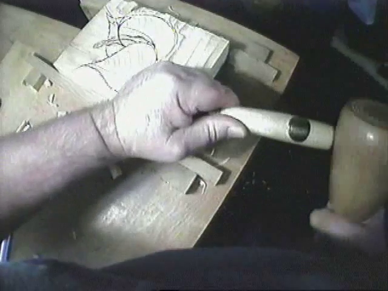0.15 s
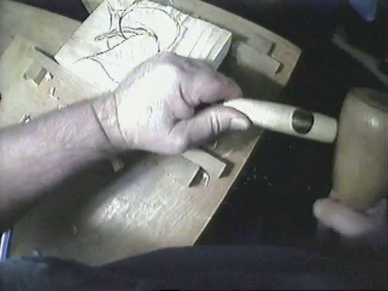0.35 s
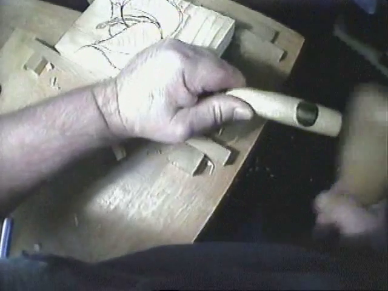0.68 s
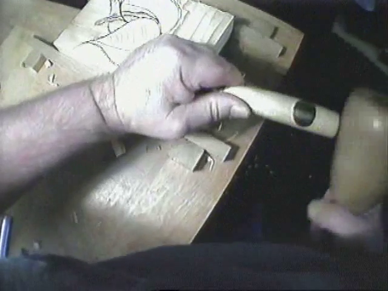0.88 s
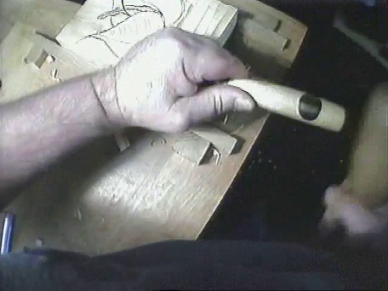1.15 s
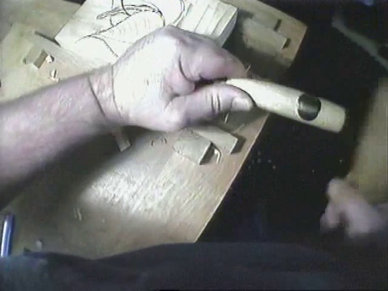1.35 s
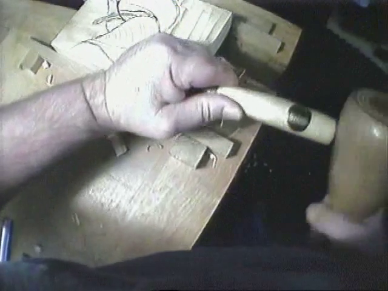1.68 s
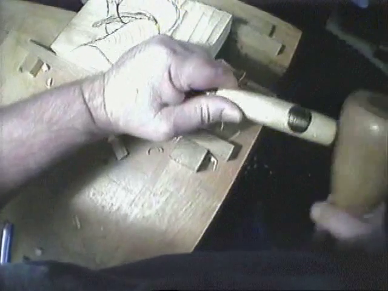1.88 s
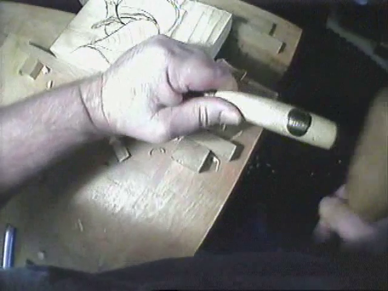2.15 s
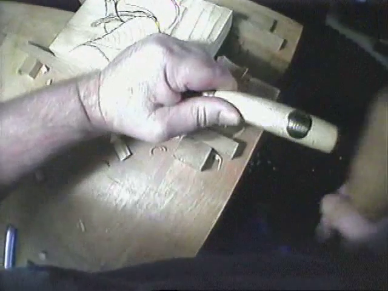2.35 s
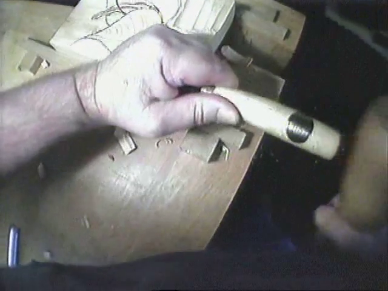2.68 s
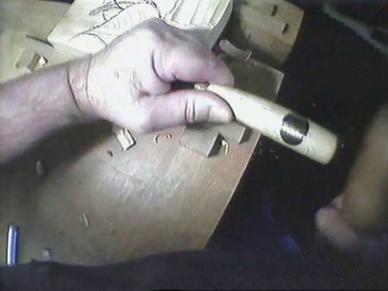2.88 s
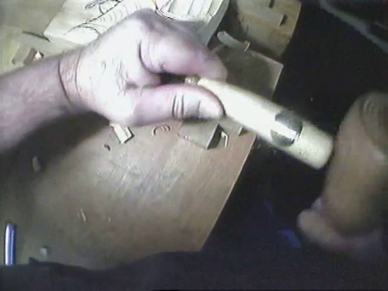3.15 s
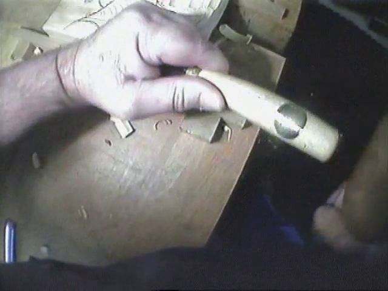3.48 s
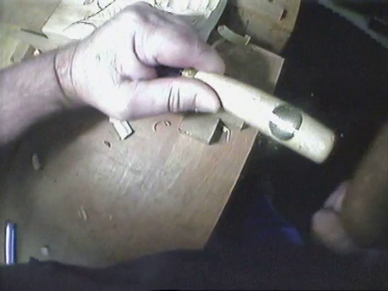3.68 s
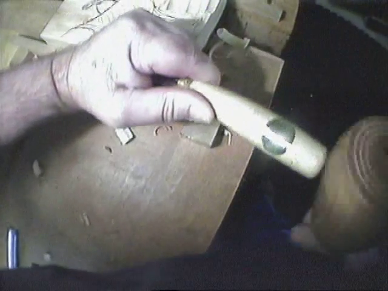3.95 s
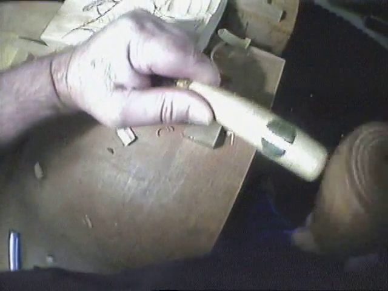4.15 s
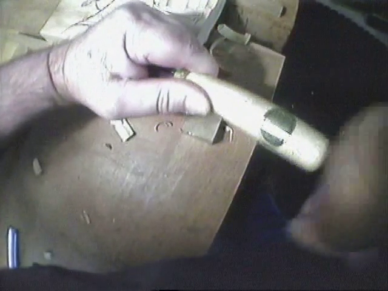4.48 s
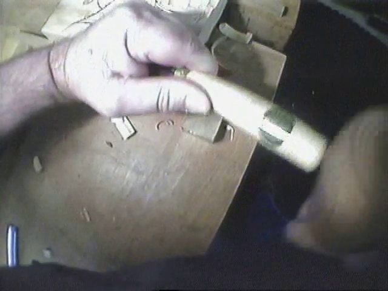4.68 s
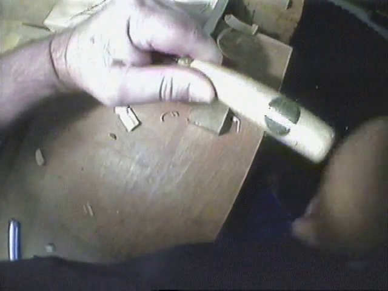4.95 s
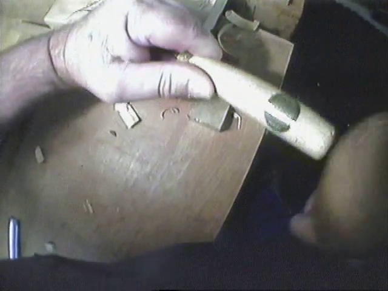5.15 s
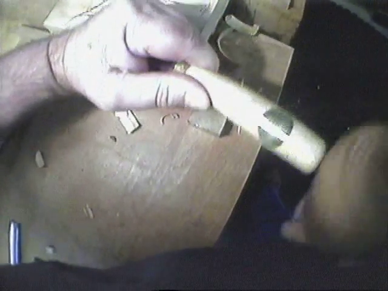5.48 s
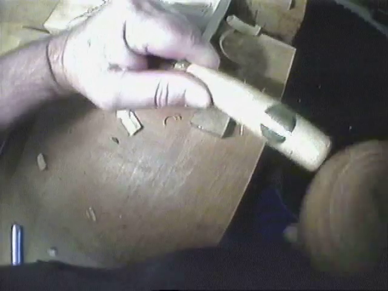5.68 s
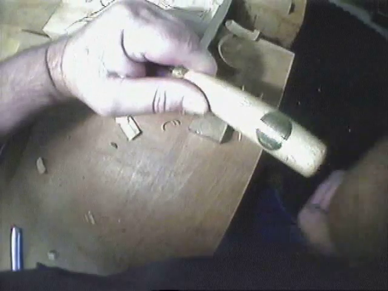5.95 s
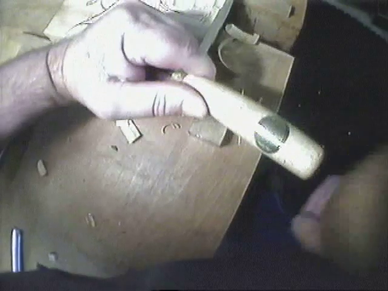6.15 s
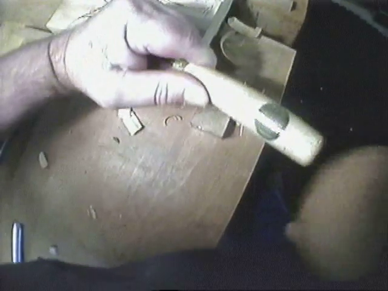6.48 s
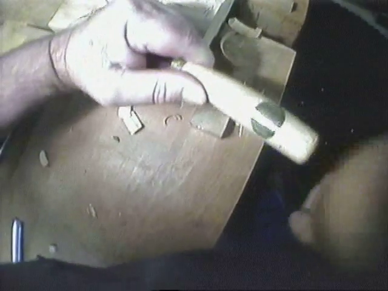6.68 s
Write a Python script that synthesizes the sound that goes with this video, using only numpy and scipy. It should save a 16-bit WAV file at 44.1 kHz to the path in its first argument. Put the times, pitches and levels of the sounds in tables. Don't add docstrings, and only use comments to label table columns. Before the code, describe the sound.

Steady, rapid mallet taps on a carving gouge, heard close in stereo. Hard woody clacks ring handle, steel and block for an instant, then the bench and room answer for a third of a second. Strong at first, they grow quieter, change colour slightly as the cut turns, and end with more knocky handle ring. One tiny shaving snap hides midway; quiet hum and hiss lie beneath.

```python
import sys
import numpy as np
from scipy import signal
from scipy.io import wavfile

SR = 44100
rng = np.random.default_rng(int(sys.argv[2]) if len(sys.argv) > 2 else 0)


def nominal_scale(level):
    x = np.asarray(level, float) / 20
    return 10 ** x


def waveform_to_disk(signal):
    frames = np.transpose(np.atleast_2d(signal))
    scaled = np.clip(frames, -1, 1) * 32767
    samples = np.round(scaled).astype(np.int16)
    wavfile.write(sys.argv[1], SR, samples)


N = 300938

# [t/s, peak level/dB, handle ring re peak/dB]
MALLET_BLOWS = [(0.09, -5.5, -19), (0.277, -6, -20), (0.469, -5.5, -18), (0.653, -5, -16.5),
                (0.836, -6, -16.5), (1.023, -5.5, -18), (1.214, -6, -18), (1.401, -5, -17),
                (1.593, -6, -18), (1.781, -7.5, -16), (1.972, -7.5, -15), (2.16, -9, -15.5),
                (2.356, -10.5, -15), (2.537, -11.5, -14.5), (2.727, -12, -15), (2.922, -11, -15.5),
                (3.116, -9.5, -14.5), (3.307, -9, -16),
                (3.499, -9, -14), (3.688, -8, -15.5), (3.879, -9, -14), (4.067, -7.5, -16),
                (4.261, -7.5, -18.5), (4.447, -7.5, -18), (4.643, -7.5, -18), (4.839, -7.5, -18.5),
                (5.037, -8, -19), (5.229, -8.5, -18), (5.423, -10.5, -18.5), (5.608, -9.5, -18.5),
                (5.802, -9.5, -18), (6.003, -9.5, -15.5), (6.197, -7.5, -16.5), (6.385, -8, -14.5),
                (6.571, -8, -13), (6.758, -9, -10)]
# [t/s, level/dB]
BLADE_FREEDOM = [
    (.1, 4),
    (1, 0.5),
    (1.6, 0.5),
    (2, -2),
    (3, -4),
    (4.1, -2.5),
    (5.5, 0.5),
    (6, -4),
    (6.8, -10.5),
]
COLOUR_HZ = [70, 200, 420, 1150, 2300, 8000]
STAGE_TIMES = [1.1, 2.6, 4.7, 6.4]
LEFT_LAGS = [.0005, .00061, .00065, .00065]
# [f/Hz, t60/s, left level/dB, right level/dB, change/dB at 3 later stages]
TOOL_MODES = [(157, 0.036, -38.5, -15, 4.5, 2, 4), (423, 0.029, -30, -9.5, -3.5, 2, 0.5),
              (735, 0.0053, 2, 0.5, 7, 9, 6), (1144.5, 0.011, -17, 3, 4, 2.5, 5.5),
              (1473, 0.0055, -2.5, 8.5, -0.5, -3, 1.5), (1892, 0.0069, -4.5, 0, -2.5, -9.5, -5),
              (2383, 0.0055, -1, 5.5, 1.5, 11, 5), (2880, 0.0037, 2, -45, -33, -67, -46),
              (3328, 0.0082, -9.5, -8.5, 0, 2.5, 4.5), (4515, 0.003, -39, 8, -1.5, 0.5, 0),
              (3940, 0.012, -10.5, -24.5, -2, -3, 1), (7108, 0.0056, -12, -16.5, 2.5, -2, 5),
              (8540, 0.0036, -26, -13.5, 3, -12, 9), (11540, 0.002, -9.5, -36, 5, -3, 11),
              (12700, .008, -34, -22, 1, -3, 7), (14700, 0.0029, -22, -23, 1, 9, -3)]
# [f/Hz, t60/s, swell/s, left level/dB, right level/dB, change/dB at 3 later stages]
BENCH_MODES = [(66.1, 0.21, 0.007, -34.5, -26.5, 7, 7, 6.5), (79.2, 0.35, 0.061, -35, -29.5, 1.5, -2.5, 0),
               (619.5, 0.05, 0.0017, -41.5, -41, -6, -38, -40),
               (176.2, 0.21, 0.0063, -26, -37, -0.5, -1.5, -2.5),
               (213.7, 0.35, 0.0073, -37.5, -33, 0, 2.5, -5),
               (251.2, 0.3, 0.06, -28.5, -25, -1.5, -6.5, -2),
               (269.4, 0.58, 0.06, -36, -33.5, -14, -30, -9), (383.3, 0.15, 0.003, -30, -29, 6.5, 10, 11),
               (508.2, 0.063, 0.0037, -28, -11, 0.5, 2, 2), (714.3, 0.27, 0.033, -69, -35, 12, 14, 14.5),
               (352, 0.051, 0.0038, -18.5, -18.5, -14, -61, -22),
               (761, 0.089, 0.0069, -23.5, -13.5, -0.5, -1.5, -1.5),
               (811.4, 0.17, 0.09, -69, -11, 8, -11, 3), (883, 0.25, 0.056, -56, -24, 3, 3.5, -9),
               (935, 0.064, 0.0077, -21, -93, 9, 0.5, 8)]
# [f/Hz, level per Hz/dB]
ROOM_COLOUR = [(40, -58), (75, -5), (125, -16.5), (240, -9.5), (330, -12), (500, -9), (780, -7.5),
               (1500, -11.5), (2500, -11.5), (4500, -22.5), (5800, -31.5), (8000, -45), (12000, -30.5),
               (16000, -85)]
# [f/Hz, t60/s]
ROOM_DECAY = [(50, 0.08), (130, 0.55), (350, 0.34), (920, 0.31), (2430, 0.27), (5200, 0.31), (14000, 0.055)]
# [f/Hz, left minus right level/dB]
STEREO_TILT = [(30, -21), (80, -4.5), (200, -4), (500, -5.5), (1300, -0.5), (3000, -3), (10000, 0.5)]
# [t/s, peak level/dB, f/Hz]
SHAVING_SNAPS = [
    (3.9728, -38.5, 6660),
]
# [f/Hz, level per Hz/dB]
HISS_COLOUR = [(25, 12), (40, 1.5), (80, 6), (400, -13), (2000, -23.5), (6000, -36), (10000, -35),
               (16000, -37.5)]


def rms_one(x):
    return x / np.sqrt(np.mean(x ** 2) + 1e-20)


def at_hz(points, hz):
    table = np.array(points)
    return np.interp(np.log(hz), np.log(table[:, 0]), table[:, 1])


def band_pass(x, low_hz, high_hz):
    return signal.sosfilt(signal.butter(2, [low_hz, high_hz], "band", fs=SR, output="sos"), x)


def noise_bands(length):
    edges = 22 * 2 ** (np.arange(30) / 3)
    white = rng.standard_normal((2, 2, length + 4000))
    bands = [band_pass(white[k % 2], edges[k], edges[k + 1]) for k in range(len(edges) - 1)]
    return np.sqrt(edges[1:] * edges[:-1]), np.array(bands)[..., -length:]


def colour_bands(points, hz, bands):
    side_db = at_hz(STEREO_TILT, hz)[:, None] * [0.5, -0.5]
    return nominal_scale(at_hz(points, hz)[:, None] + side_db)[..., None] * bands


def mode(t, hz, t60, swell, late=0):
    t = np.maximum(t, 0)
    rise = 1 - np.exp(-t / max(swell, 1e-5))
    return np.sin(2 * np.pi * hz * t - late) * nominal_scale(-60 * t / t60) * rise


def tool(t, left_lag):
    crest_s, contact_s = 0.00035, 0.0008
    crest_times = crest_s + np.array([[left_lag], [0]])
    rings = []
    for hz, t60, left, right, *change in TOOL_MODES:
        late = np.maximum(2 * np.pi * hz * crest_times - np.pi / 2, 0)
        rings.append(nominal_scale(np.array([[left], [right]])) * mode(t, hz, t60, contact_s, late))
    return np.array(rings)


def bench(t):
    return np.array([nominal_scale(np.array([[left], [right]])) * mode(t, hz, t60, swell)
                     for hz, t60, swell, left, right, *change in BENCH_MODES])


def room(t):
    level_db, start_s, swell_s = -21, 0.0029, 0.00013
    hz, bands = noise_bands(len(t))
    late = np.maximum(t - start_s, 0)
    fall = nominal_scale(-60 * late / at_hz(ROOM_DECAY, hz)[:, None, None]) * (1 - np.exp(-late / swell_s))
    coloured = colour_bands(ROOM_COLOUR, hz, bands)
    return hz, nominal_scale(level_db) * fall * coloured / coloured.sum(axis=0).std()


def blow_rows():
    thud_follows, steel_follows, block_lags = 0.96, 1.02, 0.94
    s, db, handle = np.transpose(MALLET_BLOWS)
    free = np.interp(s, *np.transpose(BLADE_FREEDOM))
    block = block_lags * (db.mean() - db)
    rows = np.transpose([s, db, thud_follows * free, block, handle - handle.mean(), steel_follows * free])
    rows = np.vstack([rows, rows[0]])
    rows[-1, :2] = -0.12, -2
    return rows


def blows():
    ring_s, lead_s = 0.7, 0.0003
    t = np.arange(round(ring_s * SR)) / SR
    short, bench_rings = t[:len(t) // 10], bench(t)
    solids = TOOL_MODES + BENCH_MODES
    solid_hz = [row[0] for row in solids]
    change_db = np.array([(0, *row[-3:]) for row in solids])
    (hz, first_room), (hz, last_room) = room(t), room(t)
    rows = blow_rows()
    scatter_db = 1.6 * rng.standard_normal((len(rows), len(solid_hz) + len(hz)))
    wobble = 0.12 * rng.standard_normal(len(rows))
    out = np.zeros((2, N + 2 * len(t)))
    for (s, db, thud, block, handle, steel), chance, shift in zip(rows, scatter_db, wobble):
        colour = np.transpose([COLOUR_HZ, [0, thud, block, 0, handle, steel]])
        stage = np.array([np.interp(s, STAGE_TIMES, knot) for knot in np.eye(len(STAGE_TIMES))])
        strength = nominal_scale(at_hz(colour, solid_hz) + change_db @ stage + chance[len(hz):])
        turn = np.pi / 2 * s * SR / N + shift
        pattern = np.cos(turn) * first_room + np.sin(turn) * last_room
        sound = np.tensordot(nominal_scale(1.11 * at_hz(colour, hz) + chance[:len(hz)]), pattern, 1)
        sound += np.tensordot(strength[len(TOOL_MODES):], bench_rings, 1)
        tool_rings = tool(short, stage @ LEFT_LAGS)
        sound[:, :len(short)] += np.tensordot(strength[:len(TOOL_MODES)], tool_rings, 1)
        at = len(t) + round((s - lead_s) * SR)
        out[:, at:at + len(t)] += nominal_scale(db) * sound
    out = blow_low_cut(far_wall(out))
    return out[:, len(t):len(t) + N]


def far_wall(x):
    delay_s, level_db = 0.082, -23.5
    echo = band_pass(x, 680, 900)
    return x + nominal_scale(level_db) * np.roll(echo, round(delay_s * SR), axis=1)


def blow_low_cut(x):
    return signal.sosfilt(signal.butter(4, 49, "high", fs=SR, output="sos"), x)


def chips():
    t, out = np.arange(N) / SR, 0
    crackle = np.diff(rng.standard_normal((2, N + 1)))
    for s, db, hz in SHAVING_SNAPS:
        late = np.maximum(t - s, 0)
        tick = mode(late, hz, 0.0079, 1e-4)
        puff_shape = 0.19 * nominal_scale(-60 * late / 0.0043) + 0.06 * nominal_scale(-60 * late / 0.22)
        out = out + nominal_scale(db - 4) * (tick + (late > 0) * crackle * puff_shape)
    return out


def background():
    hiss_db, hum_hz, hum_db = -51.5, 59.5, -54
    whine_hz, whine_db, whine_band_db = 16200, -90, -81
    hz, bands = noise_bands(N)
    hiss = rms_one(colour_bands(HISS_COLOUR, hz, bands).sum(axis=0))
    turn = 2 * np.pi * np.arange(N) / SR
    hum = nominal_scale(hum_db) * np.sin(hum_hz * turn) * [[0.4], [1]]
    flutter = band_pass(bands[-1], whine_hz - 150, whine_hz + 150)
    whine = nominal_scale(whine_db) * np.sin(whine_hz * turn) + nominal_scale(whine_band_db) * rms_one(flutter)
    return nominal_scale(hiss_db) * hiss + hum + whine


def scene():
    return blows() + chips() + background()


def low_pass(x):
    return signal.sosfilt(signal.butter(12, 16820, fs=SR, output="sos"), x)


def record(dry):
    ceiling, cutoff_hz, offset = 0.6, 17000, -0.0013
    rounded = ceiling * np.tanh(dry / ceiling)
    cut = signal.sosfilt(signal.cheby2(8, 50, cutoff_hz, fs=SR, output="sos"), rounded)
    return low_pass(cut + offset)


dry = scene()
out = record(dry)
waveform_to_disk(out)
```